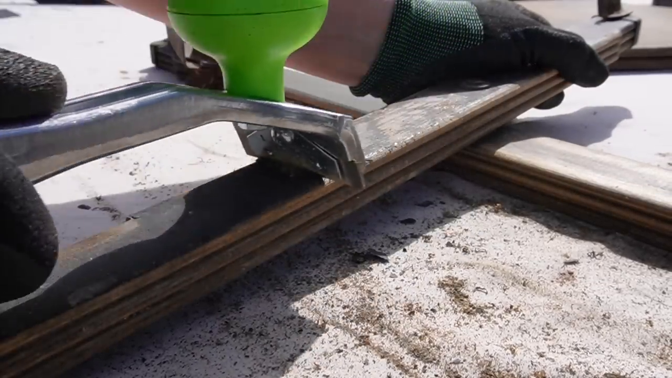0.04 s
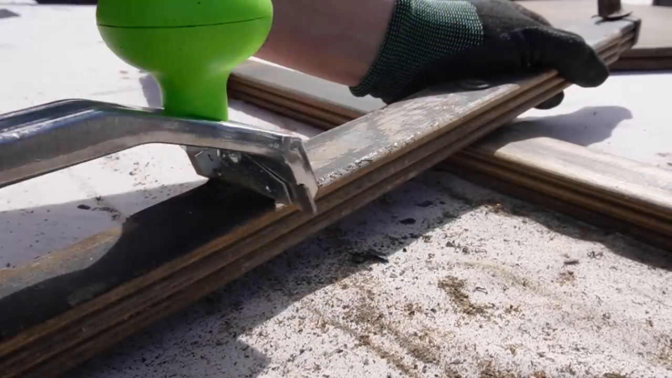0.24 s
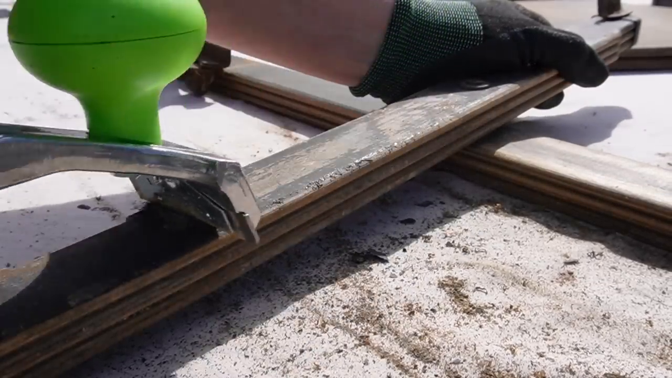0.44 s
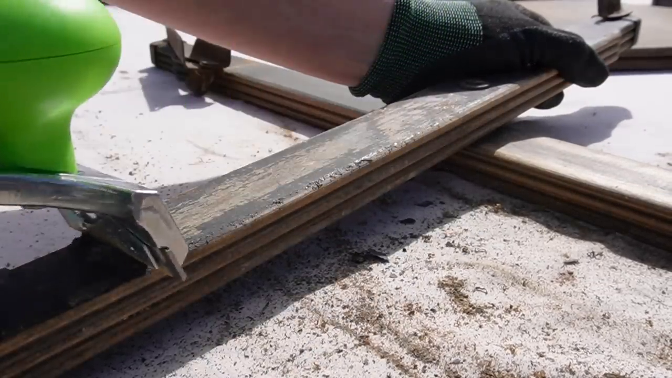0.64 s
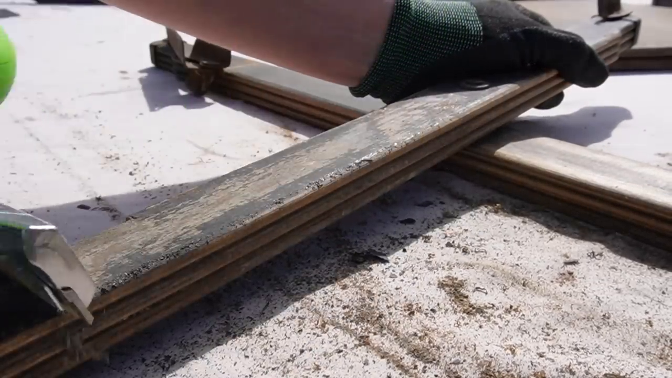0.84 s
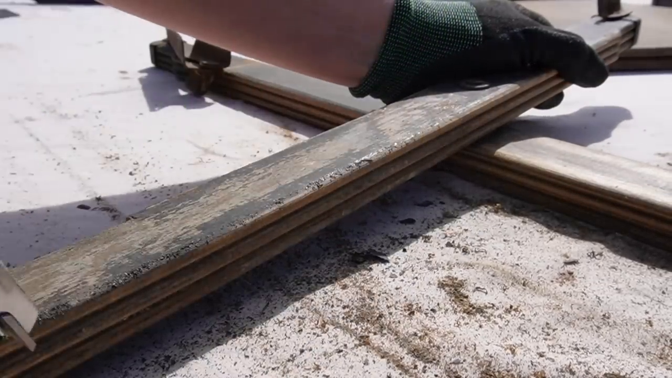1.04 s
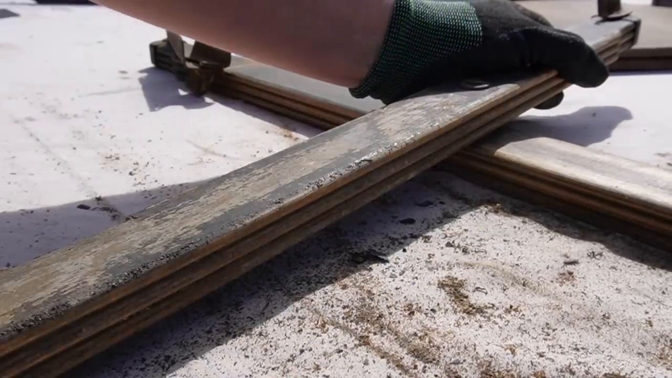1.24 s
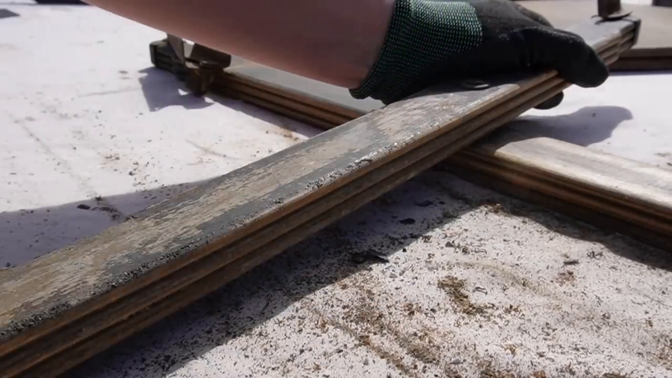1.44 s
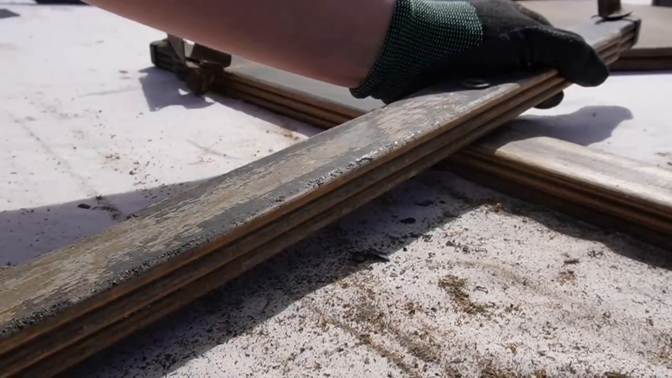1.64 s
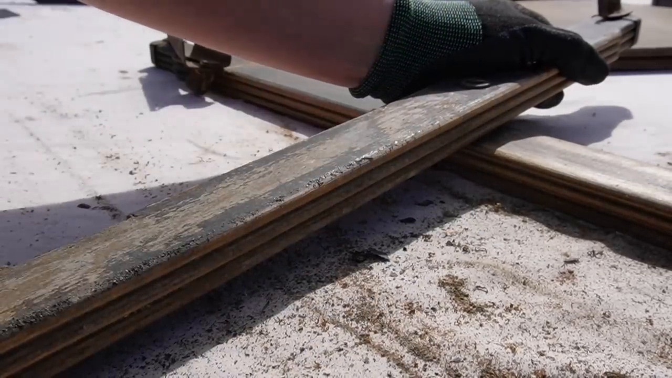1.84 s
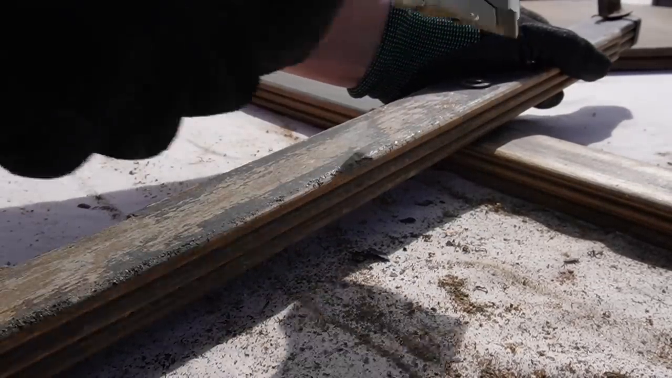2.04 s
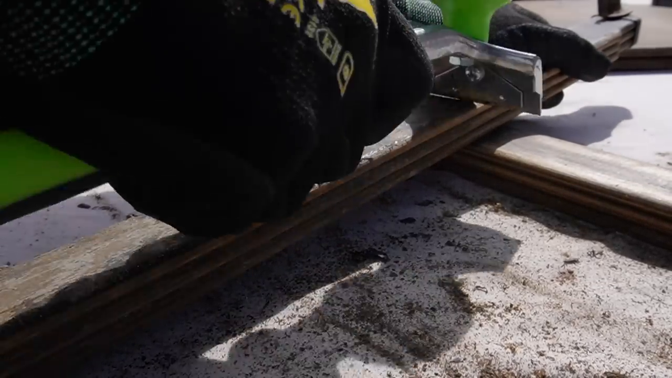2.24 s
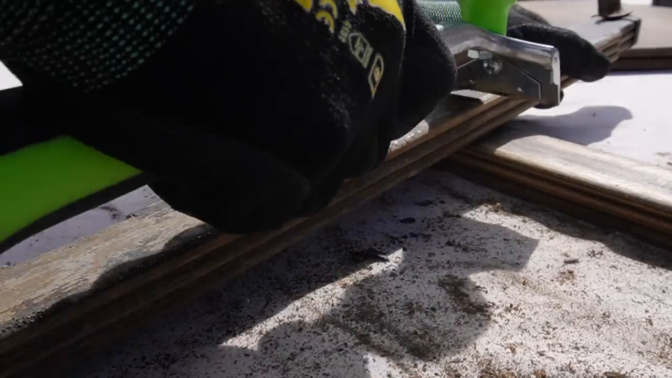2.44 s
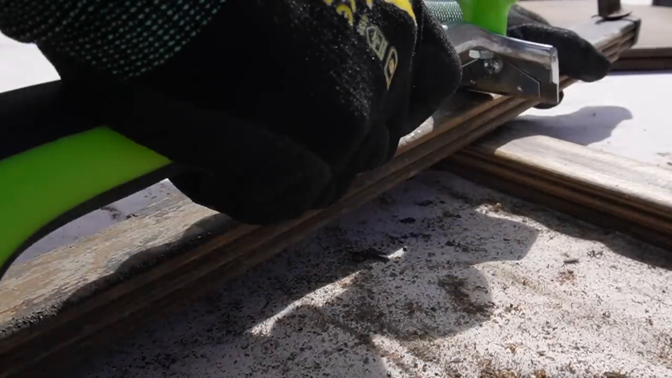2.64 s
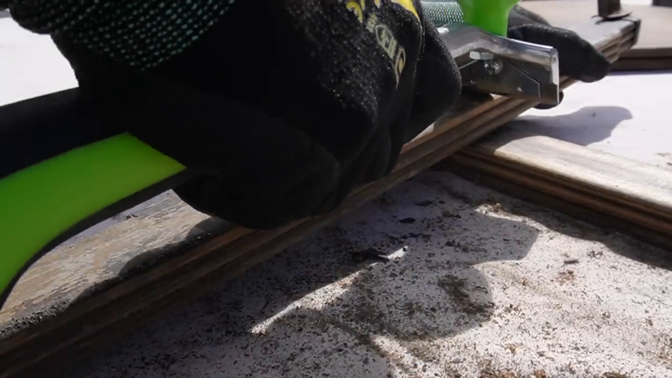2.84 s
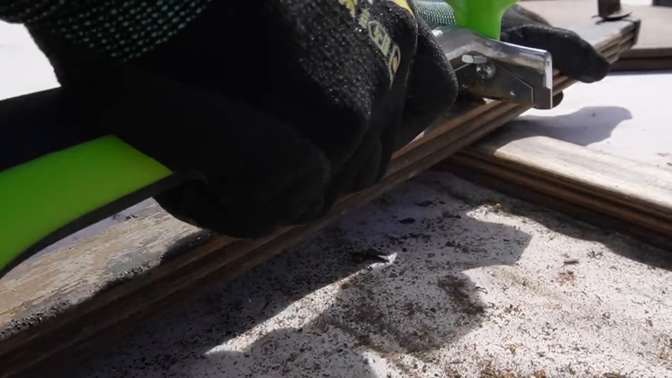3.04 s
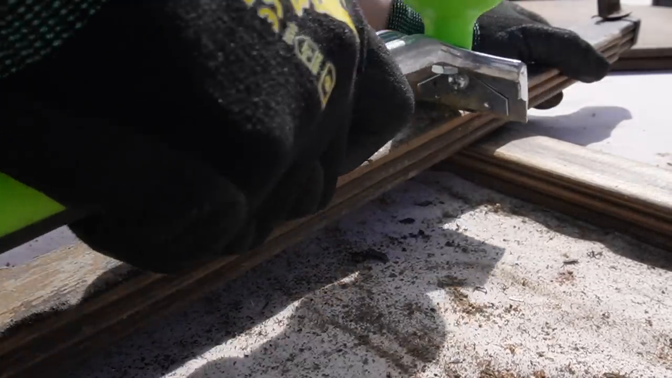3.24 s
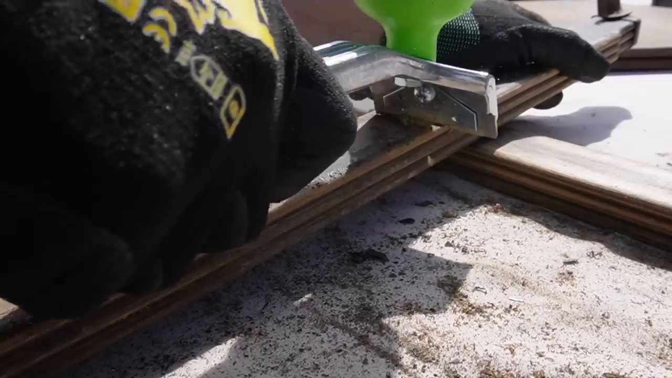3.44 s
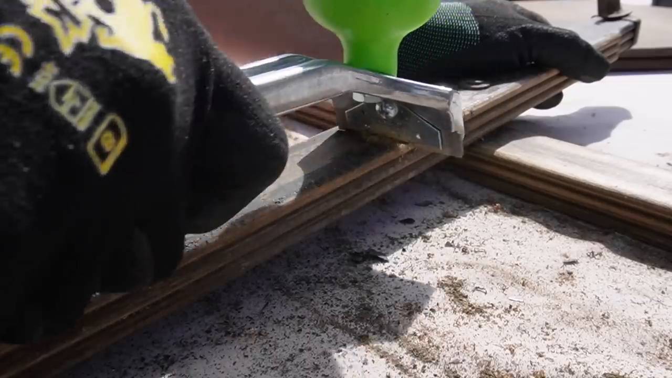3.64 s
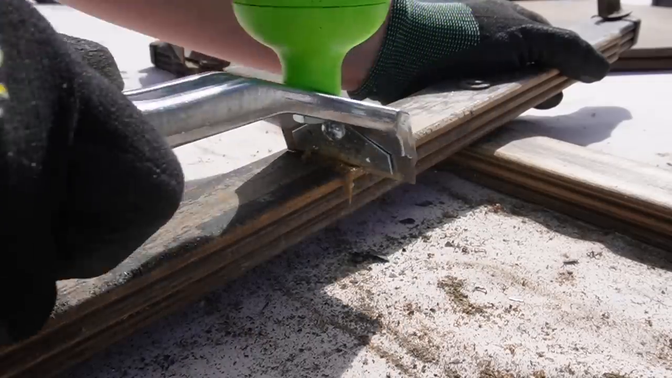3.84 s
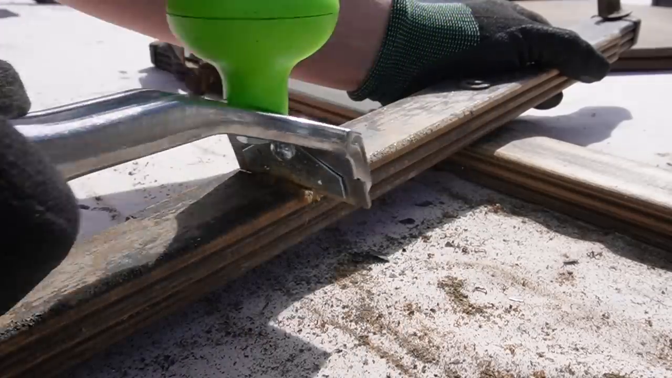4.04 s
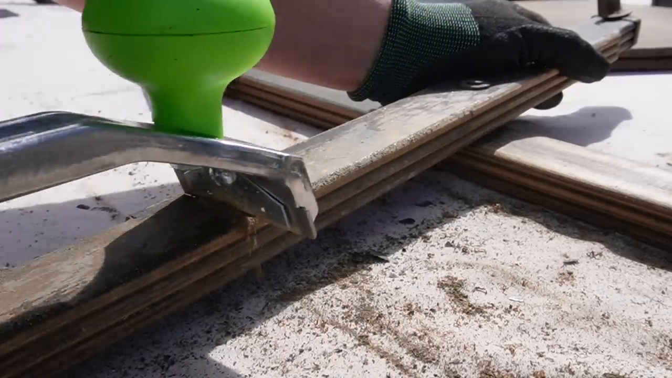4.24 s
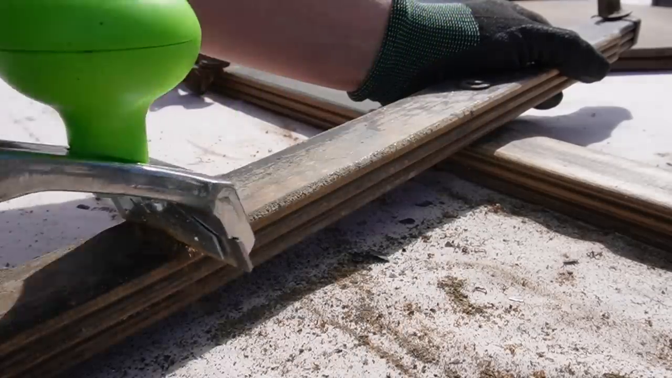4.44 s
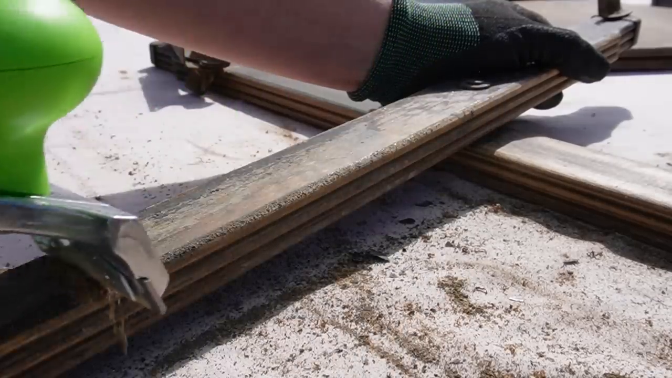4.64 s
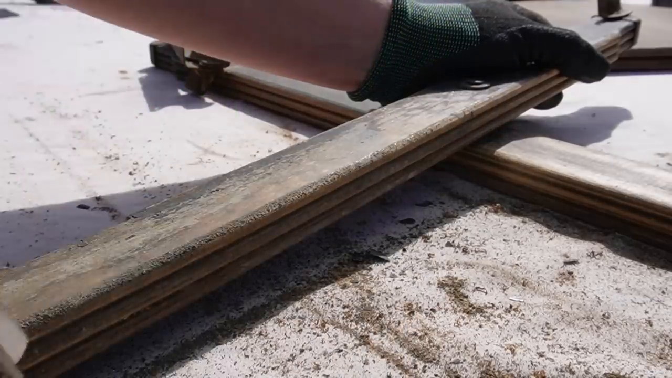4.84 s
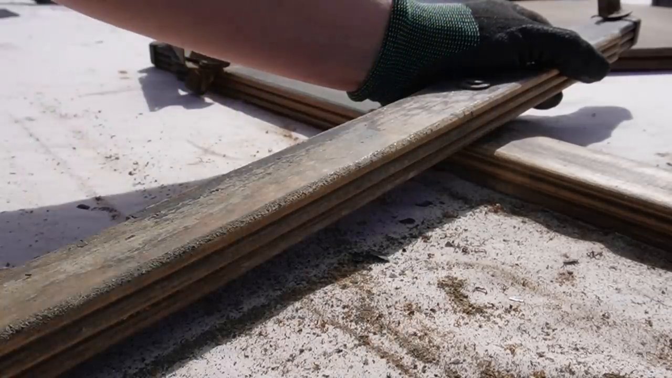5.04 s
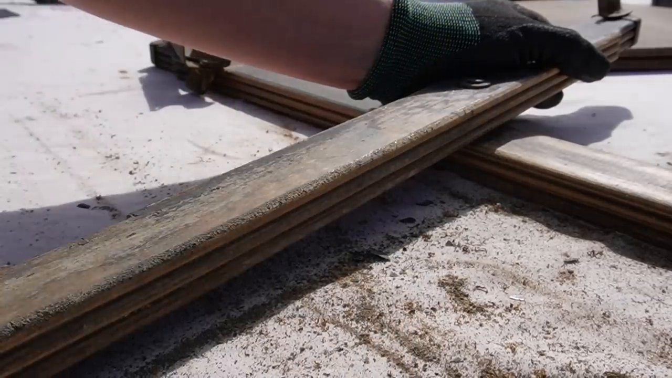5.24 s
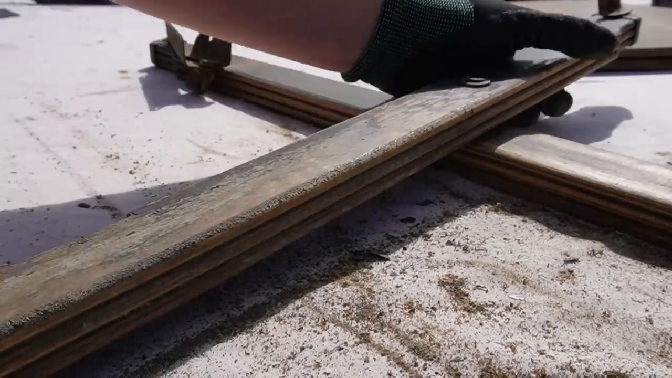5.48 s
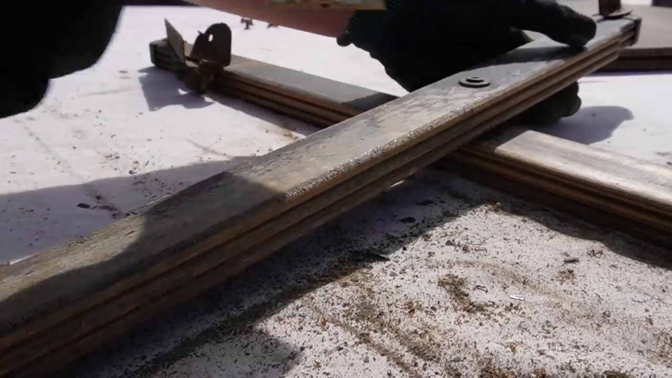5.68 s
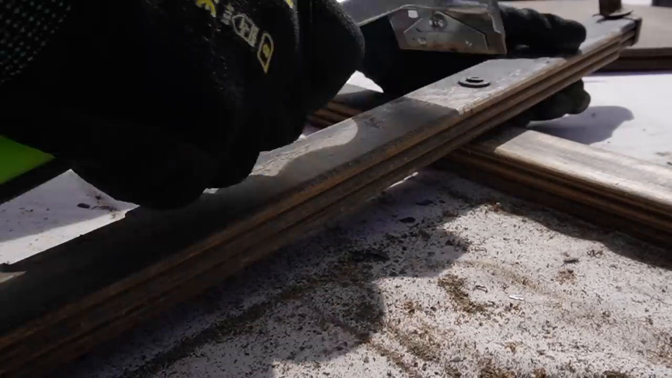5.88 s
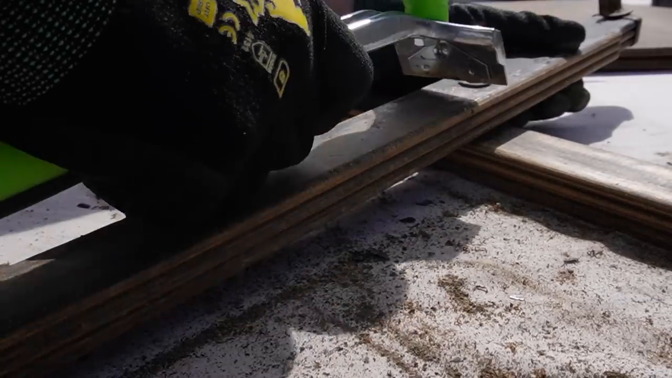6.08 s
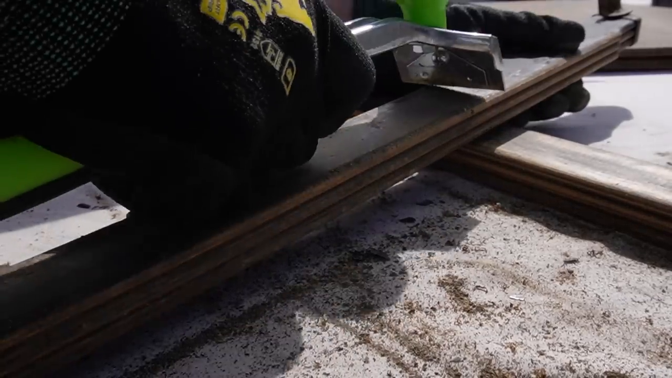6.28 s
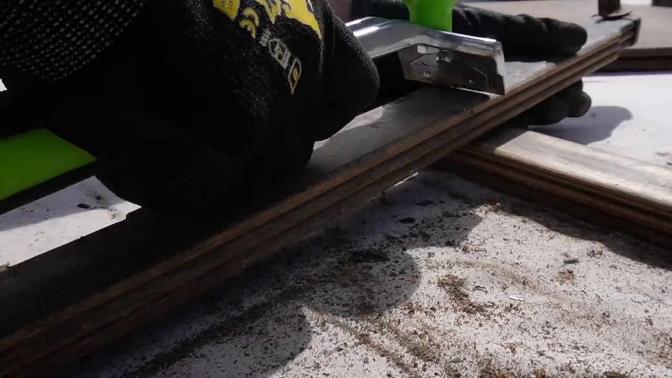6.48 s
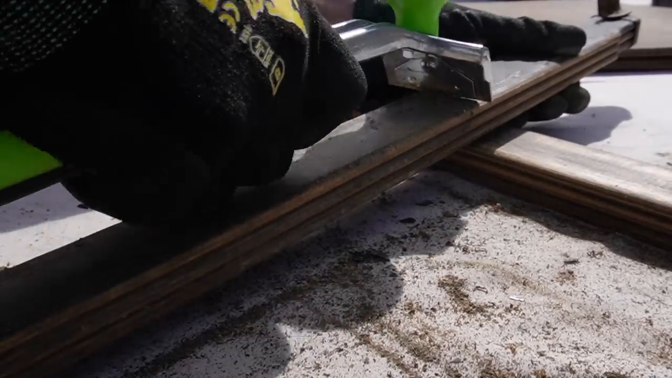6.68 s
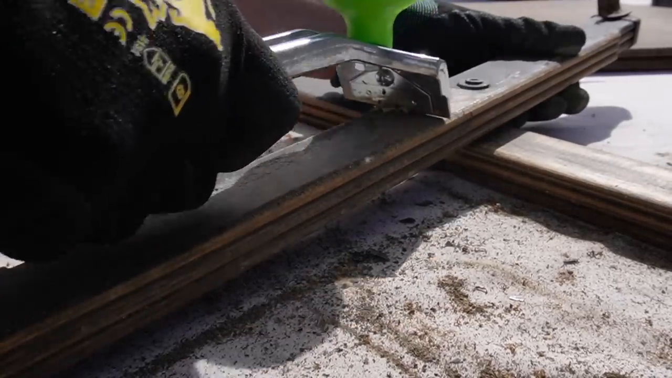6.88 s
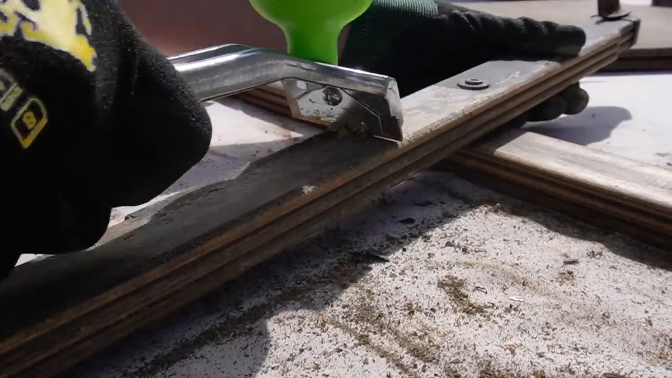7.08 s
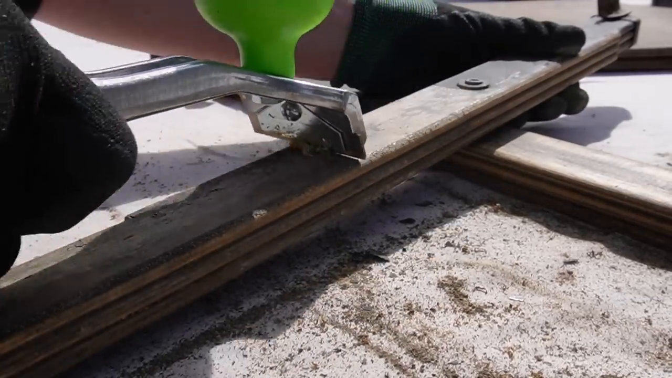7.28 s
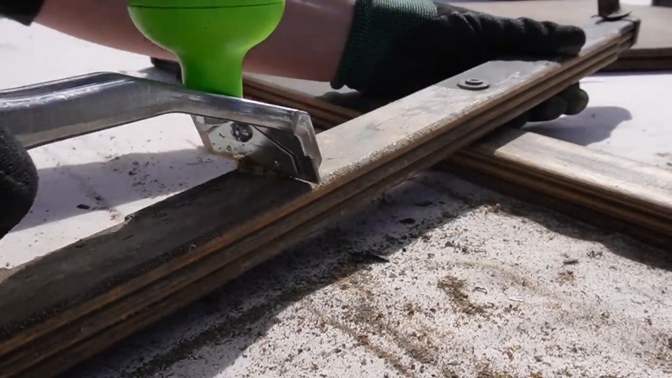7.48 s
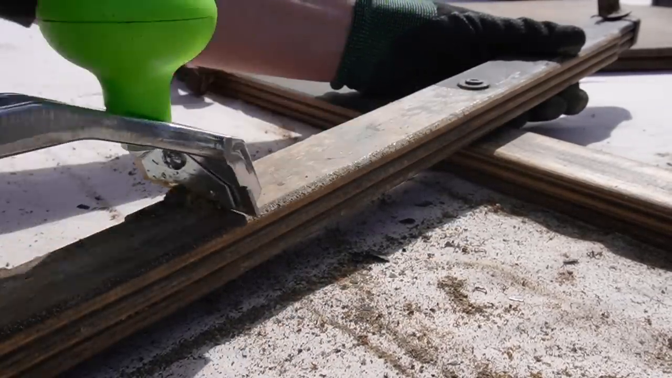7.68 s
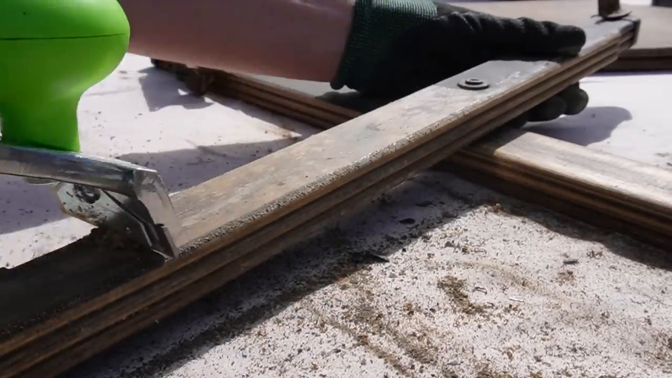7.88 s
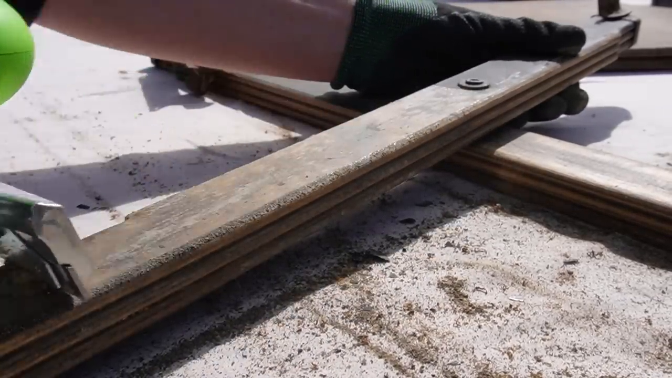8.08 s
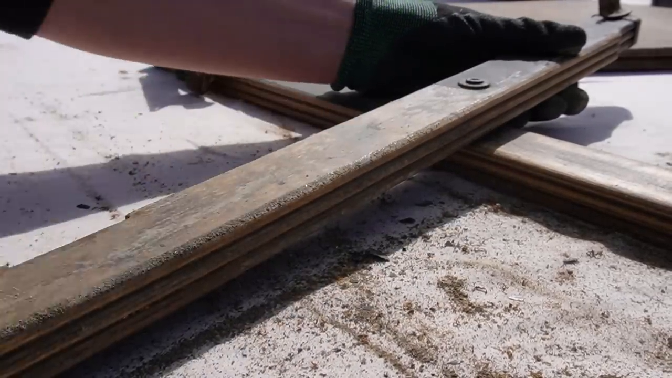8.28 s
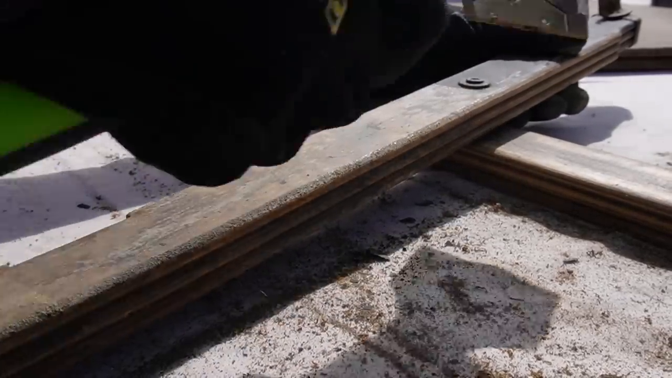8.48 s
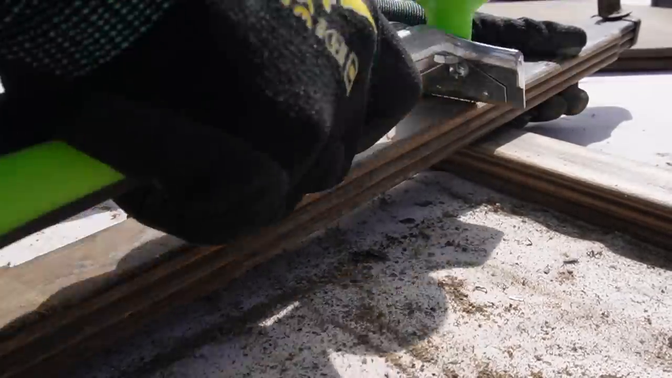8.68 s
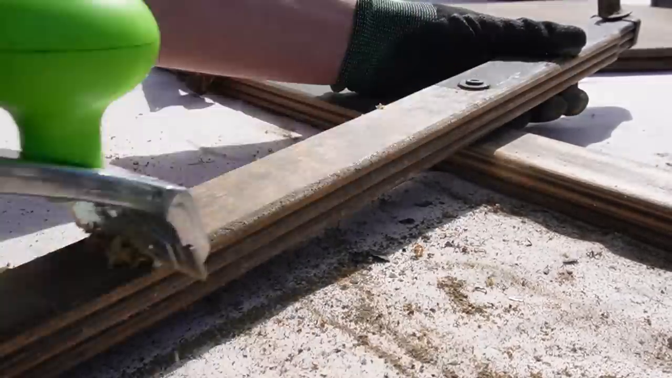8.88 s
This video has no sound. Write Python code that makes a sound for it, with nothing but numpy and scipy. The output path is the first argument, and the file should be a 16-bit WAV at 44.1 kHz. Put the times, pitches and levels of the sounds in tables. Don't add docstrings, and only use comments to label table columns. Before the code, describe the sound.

Close, gritty scraping of paint off plywood, tool knocks with faint steel rings, quiet yard birds, ending in a fast flurry of tiny hisses and clicks.

```python
import sys
import numpy as np
from scipy import signal
from scipy.fft import rfft, irfft, next_fast_len
from scipy.io import wavfile
from scipy.ndimage import uniform_filter1d

SR = 44100
rng = np.random.default_rng(int(sys.argv[2]) if len(sys.argv) > 2 else 0)


def transcribe(signal):
    frames = np.atleast_2d(signal).T
    limited = np.clip(frames, -1, 1)
    pcm = np.round(limited * 32767).astype(np.int16)
    wavfile.write(sys.argv[1], SR, pcm)


def gain_from_decibels(decibels):
    exponent = np.asarray(decibels, float) / 20
    return 10 ** exponent


N = 393372
SPEED_UP_S = 8.2

# time_s, pressure_db, board_load_db
PULLS = [
    [(0.0, -36.5, -3), (0.3, -34, -6.5), (0.7, -34.5, -5.5), (0.93, -34, -7.5), (1.1, -44.5, 0.5),
     (1.27, -40, -1), (1.44, -27.5, -14.5), (1.652, -36, -12), (1.685, -64, 5)],
    [(3.07, -47, -7), (3.13, -41, -9.5), (3.44, -37, -4), (3.9, -34.5, -4.5), (4.12, -31.5, -6),
     (4.72, -29, -3.5), (4.97, -35.5, 0.5), (5.335, -29, -13), (5.36, -75, 30)],
    [(6.682, -60.5, 11), (6.72, -41, -5), (7.05, -35.5, -10.5), (7.25, -35, -6), (7.45, -34.5, -4),
     (7.7, -31.5, -7), (7.9, -30.5, -9), (8.19, -35.5, -0.5), (8.21, -43, -6)],
]
# holder_db, blade_db, blade_fade_db, dulling_db, boom_place (0-1 along the strip)
GRIPS = [
    (-0.5, -10.5, 3, 19, 0.2),
    (-3.5, -9.5, 1, 11, 0.43),
    (0.5, -10, -1.5, 20, 0.55),
]
PART_EDGES_HZ = (1750, 3700, 7000)
LOAD_SHARE = (0.96, 0.2, 0.33, 0.14)
STALL_SHARE = (0.6, 0.9, 1.1, 1.4)
# pitch_hz, width_hz, level_db
RINGS_1 = [
    [(1320, 59, -9), (2104, 68, 4), (2910, 170, 6), (3290, 100, 1.5), (4740, 100, -7), (5820, 450, -7.5), (10600, 170, -11.5), (12400, 400, -10.5), (14500, 290, -9.5)],
    [(1448, 50, 1), (2520, 620, 3), (3340, 110, -2), (3760, 410, -5.5), (5580, 66, -0.5), (9530, 59, -9)],
]
RINGS_2 = [
    [(1380, 320, 0), (2610, 140, -4), (3210, 320, -3), (4050, 130, -4.5), (4800, 75, -7), (5970, 500, -9.5), (12380, 280, -1.5), (13600, 150, -12), (14550, 140, -8)],
    [(1376, 270, -3), (2073, 57, -1.5), (2400, 160, 0), (4800, 66, -8.5), (5930, 430, -8.5), (10230, 180, -13.5), (11970, 970, -17)],
    [(2550, 160, -6), (3330, 330, -2), (4800, 93, -10), (5620, 120, -6.5), (7400, 120, -32), ],
]
RINGS_3 = [
    [(1840, 360, -0.5), (2960, 400, -2), (4320, 360, -4.5), (5780, 170, 0), (9700, 240, -12.5), (11600, 210, -14.5), (13000, 160, -17), (15000, 40, -18)],
    [(1326, 170, 1.5), (2400, 110, -3), (2780, 180, -1), (3400, 84, -6), (6260, 170, -8.5), (12900, 230, -14), (15300, 200, -17)],
    [(1423, 35, 2.5), (2200, 500, -1), (2870, 160, -15), (3830, 82, -3.5), (4570, 70, -20), (5700, 110, -3), (13040, 140, -9)],
]
# pitch_hz, level_db
RASP_COLOUR = [(59, -76), (100, -9.5), (702, -16), (1410, -3), (2900, 5.5), (4430, -8.5), (5840, -3.5),
               (8190, -11.5), (12800, -16), (15800, -18.5)]
# pitch_hz, width_hz, level_db
PLYWOOD = [(363, 23, -14.5), (463.8, 10.3, -5), (616.9, 9.6, 1), (798, 104, -11.5), (1033, 20, -12)]
# time_s, dip_db, half_length_s
LIFTS = [(0.24, 3.5, 0.02), (0.505, 4.5, 0.016), (0.795, 6.5, 0.067), (1.03, 16, 0.029),
         (1.515, 8.5, 0.068), (3.499, 10.5, 0.027), (3.673, 3, 0.022), (4, 6.5, 0.046), (4.342, 4.5, 0.098),
         (4.596, 6.5, 0.083), (4.832, 4, 0.073), (6.933, 3, 0.03), (7.318, 5.5, 0.048), (7.6, 1.5, 0.1),
         (7.799, 5, 0.034), (8.018, 7.5, 0.088)]
# time_s, half_length_s, pitch_hz, glide_hz_per_s, level_db
BLOOMS = [(0.088, 0.091, 2870, 0, 9), (0.26, 0.11, 3390, 0, 6.5), (0.3, 0.11, 3640, 2000, 8.5),
          (0.56, 0.14, 2800, 800, 4), (0.11, 0.091, 4840, 0, 10), (0.5, .15, 770, 0, 7),
          (0.58, 0.091, 4600, 0, 9.5), (0.92, 0.059, 2030, 0, 8), (1.43, 0.049, 2600, 0, 5),
          (0.9, 0.13, 5900, 0, 7), (1.58, 0.14, 2580, 0, 7.5), (1.25, 0.073, 1570, 2, 5),
          (1.28, 0.19, 3600, 0, 7.5), (1.57, 0.16, 410, 0, 3.5), (1.3, 0.52, 835, 0, 6),
          (3.69, 0.2, 1560, 0, 6), (3.48, 0.18, 2600, 0, 8), (3.43, 0.053, 5680, 0, 15.5),
          (3.96, 0.11, 5600, 0, 9.5), (3.6, 0.046, 5300, 0, 6), (4.07, 0.12, 2950, 0, 5),
          (3.92, 0.063, 4950, 0, 12), (4.26, 0.33, 646, 0, 8.5), (3.8, 0.092, 2840, 0, 3),
          (4.6, 0.18, 4070, 0, 8), (4.82, 0.16, 1540, 600, 7.5), (5.27, 0.083, 2590, 300, 6),
          (5.22, 0.09, 3350, 600, 4), (6.92, .1, 3050, 800, 6), (7.2, .1, 3450, 0, 7),
          (7.6, 0.22, 2915, 300, 10.5), (7.72, 0.13, 3560, 2500, 11), (7.68, 0.13, 5750, -600, 6.5),
          (7.9, .12, 4020, 0, 4.5)]
# time_s, half_length_s, pitch_hz, glide_hz_per_s, level_db
NULLS = [(.1, 0.13, 4670, 0, -7), (0.34, 0.088, 4600, 0, -10), (0.52, 0.09, 5300, 500, -9),
         (1.43, .08, 3030, 0, -10), (0.057, 0.083, 5200, 0, -6), (1.19, 0.2, 2430, -1500, -10),
         (1.2, 0.14, 6200, 0, -7), (1.63, .06, 4600, 0, -9), (1.11, 0.066, 1450, 0, -9),
         (3.45, 0.36, 7750, -800, -17), (3.2, .3, 10800, -400, -5), (3.87, 0.26, 3430, 300, -11),
         (3.67, 0.14, 5030, -800, -12), (4.6, 0.22, 3540, 500, -16), (4.58, 0.12, 2700, 0, -7),
         (4.18, .12, 5480, -500, -10), (4.7, 0.044, 1450, 0, -9), (4.2, .2, 3900, 0, -7),
         (4.81, 0.42, 600, -2.5, -8.5), (4.92, .1, 5200, 0, -10), (5.1, 0.1, 1900, 0, -10),
         (6.8, 0.18, 410, 0, -7), (6.83, 0.23, 760, 0, -9), (7.15, 0.18, 2970, 0, -7),
         (7.4, 0.22, 4520, -600, -8), (7.55, 0.11, 4670, 0, -1), (7.73, 0.26, 5240, 0, -6),
         (7.2, .45, 10900, 500, -9), (6.9, .22, 13900, -800, -10), (7.3, .3, 8500, 0, -9),
         (8.03, .15, 12300, 0, -9), (7.95, .25, 15000, 0, -8), (7.15, .08, 7400, 0, -8),
         (1.49, 0.06, 1590, 0, -9), (4.17, .1, 4560, 0, -8), (5.3, 0.19, 3140, 300, -13)]
SLIPS_PER_S, TOUCH_SLIPS_PER_S = 11900, 1100
BLOOM_WIDTH_HZ, NULL_WIDTH_HZ, WIDER_PER_KHZ = 63, 97, 23
BOOM_HZ, BOOM_LOSS_DB = 910, 5.5

# time_s, level_db
RUMBLE = [(0.0, -82), (1.31, -68.5), (1.81, -79), (2.73, -80), (5.12, -68), (5.95, -79), (8.19, -61.5),
          (8.5, -87), (8.53, -95), (8.64, -95), (8.68, -79), (8.9, -79)]
# pitch_hz, level_db
RUMBLE_COLOUR = [(20, -19.5), (50, -15), (105, -3.5), (140, -18), (220, -37)]
# pitch_hz, level_db
AIR_COLOUR = [(71, -48), (120, -25), (170, 0), (208, -3), (602, -13.5), (724, -11), (2220, -13.5),
              (3210, -13), (15800, -49)]
# pitch_hz, level_db
QUICK_AIR_COLOUR = [(120, -84), (200, -49), (408, -9), (472, -3.5), (3050, -9.5), (4240, -14.5),
                    (15800, -22.5)]
AIR_DB, QUICK_AIR_DB = -69.5, -60.5

# start_s, level_db, treble_db
RUSTLES = [
    (1.65, -49, -59.5),
    (2.1, -65, -72),
    (5.33, -50, -65.5),
    (5.76, -61, -74),
    (6.4, -51.5, -67),
]
# pitch_hz, level_db
RUSTLE_COLOUR = [(120, -32), (200, -5.5), (1410, -14), (3160, -8), (4160, -2), (15800, -34)]
RUSTLE_RISE_S, RUSTLE_T60_S, REST_DB, REST_TREBLE_DB = 0.015, 1.19, -86, -86

# start_s, length_s, first_hz, last_hz, level_db
BLURRED_NOTES = [(1.68, 0.2, 2363, 2400, -62), (1.718, 0.11, 4200, 4290, -58.5),
                 (2.013, 0.04, 4900, 4600, -64), (2.082, 0.095, 4320, 4130, -66.5),
                 (2.105, 0.06, 2900, 2000, -67), (2.28, 0.053, 4330, 4150, -68),
                 (5.391, .07, 2370, 2350, -62.5), (5.661, .1, 4300, 4150, -73),
                 (5.942, 0.07, 4390, 4100, -65)]
# start_s, length_s, first_hz, last_hz, level_db
CLEAR_NOTES = [(2.044, 0.031, 4200, 3300, -62), (6.127, .055, 2960, 2550, -70),
               (6.26, 0.05, 4490, 4650, -60.5), (5.48, 0.064, 2400, 2360, -67),
               (5.78, 0.079, 4260, 4020, -67), (5.96, .06, 4600, 3950, -66),
               (6.043, 0.1, 4360, 3350, -61.5), (6.308, 0.072, 4250, 4060, -65),
               (6.49, 0.044, 4250, 3900, -63), (6.65, .04, 4100, 4150, -60)]
# start_s, length_s, first_hz, last_hz, level_db
THIN_NOTES = [
    (2.083, 0.039, 2960, 2955, -59),
    (6.05, 0.035, 4800, 4750, -64),
    (6.125, 0.03, 2960, 2950, -66),
]
BLURRED_BLUR_HZ, CLEAR_BLUR_HZ, THIN_BLUR_HZ = 350, 100, 30

# start_s, peak_db, thud_hz, treble_db, board_db
KNOCKS = [(2.342, -18, 2520, -10.5, 9), (2.351, -25.5, 3360, -13, -29), (2.633, -24, 1800, -12, 11.5),
          (2.64, -29, 1470, -9, -28), (2.745, -37.5, 1930, 2, 7), (2.977, -51, 3400, 2, -14),
          (3.014, -49, 3060, 11, -8), (3.038, -46, 3940, -10, 9), (6.247, -31, 3340, -6, 17),
          (6.2523, -18.5, 3600, -14, -26), (6.329, -46, 3300, 8, -5), (6.538, -23, 3740, -13, 1.5),
          (6.626, -34, 2620, 5, 2), (6.631, -38.5, 4300, 7, -10)]
# pitch_hz, level_db, t60_s
BOARD = [(235, -3.5, 0.052), (331, -14.5, 0.16), (440, -11, 0.068), (609, -12.5, 0.11), (758, -15, 0.14),
         (870, 2.5, 0.032), (1430, -18, 0.08), (1800, 1, 0.042)]
HOLDER_HZ = 4150
# start_s, lower_pair_db, upper_pair_db
CHIMES = [
    (2.352, -55, -59),
    (2.642, -65, -67),
    (6.254, -68, -69),
    (6.54, -76, -65),
]
# pitch_hz, level_db, t60_s
STEEL = [(5222, -8, .16), (7160, 0, .12), (9577, 0, .14), (11500, -4, .2)]
# start_s, length_s, first_db, last_db
TOUCHES = [(3.029, 0.045, -71, -60), (6.291, 0.05, -74, -65), (6.413, 0.072, -68, -71),
           (6.642, 0.035, -76, -70)]
# holder_db, blade_db, blade_fade_db, dulling_db, boom_place (0-1)
TOUCH_GRIP = (2, -1, -6, 10, 0)
TOUCH_LOAD_DB = 1
# start_s, peak_db
RATTLES = [(6.416, -50), (6.421, -44), (6.437, -48), (6.445, -52), (6.45, -52), (6.457, -51), (6.468, -56),
           (6.476, -55)]

# start_s, length_s, first_db, last_db
QUICK_STROKES = [(8.198, 0.082, -28.5, -31.5), (8.324, 0.028, -34, -30), (8.341, 0.032, -27, -26.5),
                 (8.41, 0.067, -29.5, -30), (8.499, 0.02, -36, -34), (8.657, 0.044, -37.5, -42.5),
                 (8.686, 0.038, -35, -35.5), (8.713, 0.041, -46, -59), (8.761, 0.036, -43.5, -34),
                 (8.79, .04, -30.5, -30), (8.863, 0.041, -43, -33.5), (8.89, 0.053, -28.5, -27.5)]
# pitch_hz, level_db
QUICK_COLOUR = [(60, -27), (180, -22.5), (250, -26.5), (3150, -18.5), (3740, -12), (4300, -10), (4860, -5),
                (6990, -4), (14700, 3), (15800, 1)]
# pitch_hz, width_hz, level_db
QUICK_RINGS = [(4946, 290, 4), (6250, 150, 5), (8100, 400, 3), (11100, 800, 4), (14610, 580, 3.5)]
QUICK_RISE_S, QUICK_FALL_S, QUICK_ENDS_DB, QUICK_LOW_DB = 0.0056, 0.014, -13, -14
# start_s, peak_db, board_db
QUICK_KNOCKS = [(8.312, -21.5, -13), (8.406, -19, -6), (8.499, -21, -11), (8.596, -24.5, -19),
                (8.76, -18, -12.5), (8.859, -14, -13), (8.464, -26, -20)]
# pitch_hz, level_db, t60_s
QUICK_BOARD = [(719, -13.5, 0.042), (1536, -17.5, 0.035), (2010, -12, 0.029)]
# start_s, level_db
GRABS = [(8.419, -29), (8.499, -33), (8.618, -43), (8.663, -35), (8.686, -27.5), (8.696, -29),
         (8.716, -25.5), (8.794, -30), (8.801, -25), (8.877, -28), (8.893, -17), (8.905, -19)]
# time_s, pitch_hz, level_db
HUM = [
    (8.42, 390, -67),
    (8.712, 444, -65.5),
    (8.9, 475, -77),
]

# pitch_hz, likeness (0-1)
LIKENESS = [(30, 0.98), (100, 1), (900, 0.97), (2200, 0.99), (3500, .95), (5500, 0.9), (10000, 0.82),
            (15000, 0.78)]
# pitch_hz, left_over_right_db
LEAN = [(61, 0.44), (3400, 0.5), (5500, 3), (9000, 0.54)]
# time_s, difference_db
ASIDE = [(0, -4), (0.5, -0.5), (1.66, 7.5), (3.07, -4.5), (5.36, 8), (6.69, -3), (8.19, 3.5), (8.21, -0.5),
         (8.52, -1), (8.64, -11)]
SIDE_DROP_DB, SIDE_KEPT_HZ = -18.5, 900
EDGE_HZ = 15760


def evened(x):
    return x / np.sqrt(np.mean(x ** 2) + 1e-20)


def read(points, hz):
    f, value = np.transpose(points)
    return np.interp(np.log(hz + 1), np.log(f + 1), value)


def add(mix, s, sound):
    part = mix[round(s * SR):][:len(sound)]
    part += sound[:len(part)]


def shaped(x, gain):
    size = next_fast_len(x.shape[-1] + 4096)
    spectrum = rfft(x, size) * gain(np.fft.rfftfreq(size, 1 / SR))
    return irfft(spectrum, size)[..., :x.shape[-1]]


def parts(x, edges_hz):
    lows = [0 * x]
    for edge in edges_hz:
        lows.append(shaped(x, lambda hz: 1 / (1 + (hz / edge) ** 12)))
    lows.append(x)
    return [evened(b - a) for a, b in zip(lows, lows[1:])]


def patchy(x, patchy_db, frames, bins, size=256, body=None):
    hz, t, z = signal.stft(x, SR, nperseg=size, noverlap=size * 3 // 4)
    patches = uniform_filter1d(rng.standard_normal(z.T.shape), frames, 0)
    patches = uniform_filter1d(patches, bins, 1)
    z = z * gain_from_decibels(patchy_db * evened(patches).T)
    if body:
        z = z * body(hz[:, None], t / t[-1])
    return signal.istft(z, nperseg=size, noverlap=size * 3 // 4)[1][:len(x)]


def slips(count, per_s, spread_db):
    chance, sign, strength = rng.random((count, 3)).T
    happens = chance < per_s / SR
    return happens * np.sign(sign - 0.5) * gain_from_decibels(-spread_db * np.log(strength + 0.032))


def played(rows):
    s, *columns = np.transpose(rows)
    t = np.arange(s[0], s[-1], 1 / SR)
    since_start = t - s[0] + (s[0] == 0)
    until_end = s[-1] - t + (s[-1] > N / SR - 0.01)
    fade = np.clip(np.minimum(since_start, until_end) / 0.004, 0, 1)
    return s[0], fade, [np.interp(t, s, c) for c in columns]


def rung(modes, t):
    return sum(gain_from_decibels(db - 60 * t / t60) * np.sin(2 * np.pi * hz * t) for hz, db, t60 in modes)


def two_part(rows, colour, edge_hz, per_s, spread_db, patchy_db):
    s, fade, columns = played(rows)
    hiss = shaped(slips(len(fade) + 512, per_s, spread_db), lambda hz: gain_from_decibels(read(colour, hz)))
    low, high = parts(patchy(hiss, patchy_db, frames=6, bins=5)[:len(fade)], [edge_hz])
    return s, fade, low, high, columns


def passing_db(hz, t, table, width_hz):
    total_db = 0
    for at, half, f, glide, db in table:
        if t.min() - 0.1 < at < t.max():
            width = width_hz + WIDER_PER_KHZ * f / 1000
            off_pitch = (hz - f - glide * (t - at)) / width
            total_db = total_db + db * np.exp(-((t - at) / half) ** 2 - off_pitch ** 2)
    return total_db


def ringing(hz, modes):
    power = 0
    for f, width, db in modes:
        off_pitch = 2 * (hz - f) / (width + f * f / 2e6)
        power = power + gain_from_decibels(db) ** 2 / (1 + off_pitch ** 2) ** 1.06
    return power


def stroke(rows, rings, holder_db, blade_db, fade_db, dulling_db, boom_at, per_s):
    s, fade, (pressure_db, load_db) = played(rows)
    count = len(fade) + 2048

    def body(hz, place):
        power = gain_from_decibels(read(RASP_COLOUR, hz) - 9.5) ** 2 + ringing(hz, PLYWOOD)
        for k, modes in enumerate(rings):
            nearness = np.clip(1 - abs(place * (len(rings) - 1) - k), 0, 1)
            power = power + nearness ** 0.79 * ringing(hz, modes)
        now = s + place * count / SR
        spot_db = passing_db(hz, now, BLOOMS, BLOOM_WIDTH_HZ) + passing_db(hz, now, NULLS, NULL_WIDTH_HZ)
        shade_db = dulling_db * place * np.clip(np.log2(hz / 9000 + 1e-9), 0, 1)
        held_down_db = BOOM_LOSS_DB * (place - boom_at) ** 2 / (1 + (hz / BOOM_HZ) ** 4)
        low_cut = hz ** 2 / (hz ** 2 + 120 ** 2)
        return np.sqrt(power) * low_cut * gain_from_decibels(spot_db - shade_db - held_down_db)

    drive = patchy(slips(count, per_s, 3.2), 0.89, frames=40, bins=5)
    rasp = patchy(drive, 2.38, frames=20, bins=5, size=2048, body=body)[:len(fade)]
    judder = evened(uniform_filter1d(rng.standard_normal(len(fade)), size=500))
    t = s + np.arange(len(fade)) / SR
    stall_db = sum(db * np.exp(-((t - at) / half) ** 2) for at, db, half in LIFTS)
    held_db = (0, 0, holder_db, blade_db - fade_db * np.linspace(0, 1, len(t)))
    scrape = 0
    for part, held, load, stall in zip(parts(rasp, PART_EDGES_HZ), held_db, LOAD_SHARE, STALL_SHARE):
        scrape = scrape + gain_from_decibels(pressure_db + held + load * load_db - stall * stall_db) * part
    return s, fade * gain_from_decibels(0.97 * judder) * scrape


def rumble():
    s, fade, (db,) = played(RUMBLE)
    noise = rng.standard_normal(len(fade))
    return s, fade * gain_from_decibels(db) * evened(shaped(noise, lambda hz: gain_from_decibels(read(RUMBLE_COLOUR, hz))))


def air():
    quick = np.clip((np.arange(N) / SR - SPEED_UP_S) / 0.01, 0, 1)
    noise = rng.standard_normal(N) + 0.81 * rng.standard_normal((2, N))
    slow = gain_from_decibels(AIR_DB) * evened(shaped(noise, lambda hz: gain_from_decibels(read(AIR_COLOUR, hz))))
    fast = gain_from_decibels(QUICK_AIR_DB) * evened(shaped(noise, lambda hz: gain_from_decibels(read(QUICK_AIR_COLOUR, hz))))
    return (1 - quick) * slow + quick * fast


def rustle():
    rows = [(0, 0), (SPEED_UP_S, SPEED_UP_S)]
    s, fade, low, high, (t,) = two_part(rows, RUSTLE_COLOUR, 3800, 6000, 1.8, 0.97)
    low_gain, high_gain = gain_from_decibels(REST_DB), gain_from_decibels(REST_TREBLE_DB)
    for at, db, treble_db in RUSTLES:
        swell = np.clip((t - at) / RUSTLE_RISE_S, 0, 1) * gain_from_decibels(-60 * np.maximum(t - at, 0) / RUSTLE_T60_S)
        low_gain = low_gain + gain_from_decibels(db) * swell
        high_gain = high_gain + gain_from_decibels(treble_db) * swell
    return s, fade * (gain_from_decibels(-9.5) * low_gain * low + gain_from_decibels(-1.5) * high_gain * high)


def bird(s, length, first_hz, last_hz, db, blur_hz):
    t = np.arange(0, length + 0.23, 1 / SR)
    trill = np.sin(2 * np.pi * 28 * t)
    hz = np.interp(t, [0, length], [first_hz, last_hz]) + 0.556 * blur_hz * trill
    r = np.exp(-np.pi * max(2.1 * blur_hz, 10) / SR)
    noise = rng.standard_normal((len(t) + 2000, 2)) @ [1, 1j]
    blur = signal.lfilter([1], [1, -2 * r, r * r], noise)[-len(t):]
    swell = np.clip(t / 0.0081, 0, 1) * gain_from_decibels(-900 * np.maximum(t - length, 0) + 0.98 * trill)
    note = swell * evened((blur * np.exp(2j * np.pi * np.cumsum(hz) / SR)).real)
    echoes = rng.standard_normal(len(t)) * gain_from_decibels(-60 * t / 0.33)
    echoed = signal.fftconvolve(note, echoes / np.linalg.norm(echoes))[:len(t)]
    return s, gain_from_decibels(db) * (0.74 * note + 0.84 * echoed)


def knock(s, db, hz, treble_db, board_db):
    t = np.arange(SR // 5) / SR
    noise = rng.standard_normal(len(t))

    def crack_colour(f):
        band = (f / (f + 700)) ** 2 / (1 + (f / 4800) ** 10)
        return band * (0.31 + 1 / (1 + ((f - hz) / 800) ** 2))

    crack = evened(shaped(noise, crack_colour))
    burst = (t / 0.0023) ** 1.12 * np.exp(1.47 * (1 - t / 0.0015))
    tones = 0.58 * np.sin(2 * np.pi * hz * t) + 0.3 * np.sin(2 * np.pi * HOLDER_HZ * t)
    blow = (tones + 0.34 * crack + gain_from_decibels(treble_db - 15.5) * noise) * burst
    dying = gain_from_decibels(-22.0 - 60 * t / 0.039) + gain_from_decibels(-36.5 - 60 * t / 0.21)
    tail = crack * dying * np.clip(t / 0.00052, 0, 1)
    boom = gain_from_decibels(board_db - 23.0) * rung(BOARD, t) * np.clip(t / 0.0043, 0, 1)
    return s, gain_from_decibels(db + 0.5) * (blow + tail + boom)


def chime(s, low_db, high_db):
    t = np.arange(SR // 4) / SR
    rings = gain_from_decibels(low_db) * rung(STEEL[:2], t) + gain_from_decibels(high_db) * rung(STEEL[2:], t)
    return s, rings * np.clip(t / 0.002, 0, 1)


def touch(s, length, first_db, last_db):
    rows = [(s, first_db, TOUCH_LOAD_DB), (s + length, last_db, TOUCH_LOAD_DB)]
    return stroke(rows, RINGS_3, *TOUCH_GRIP, TOUCH_SLIPS_PER_S)


def rattle(s, db):
    return knock(s, db, 3100, 11, 8)


def quick_rings(x):
    def gain(hz):
        return gain_from_decibels(sum(db * np.exp(-((hz - f) / width) ** 2) for f, width, db in QUICK_RINGS))

    return evened(shaped(x, gain))


def quick_stroke(s, length, first_db, last_db):
    rows = [(s, first_db + QUICK_ENDS_DB),
            (s + min(QUICK_RISE_S, length / 4), first_db),
            (s + length - min(QUICK_FALL_S, length / 2), last_db),
            (s + length, last_db + QUICK_ENDS_DB)]
    s, fade, low, high, (db,) = two_part(rows, QUICK_COLOUR, 3800, 20000, 4.0, 2.6)
    return s, fade * gain_from_decibels(db) * (quick_rings(high) + gain_from_decibels(QUICK_LOW_DB) * low)


def quick_knock(s, db, board_db):
    t = np.arange(SR // 10) / SR
    noise = shaped(rng.standard_normal(len(t)), lambda hz: hz ** 4 / (hz ** 4 + 900 ** 4))
    dying = gain_from_decibels(-60 * t / 0.0032) + 0.25 * gain_from_decibels(-60 * t / 0.018)
    tick = noise * dying * np.clip(t / 0.00034, 0, 1)
    return s, gain_from_decibels(db - 2.5) * (tick + gain_from_decibels(board_db + 3.5) * rung(QUICK_BOARD, t))


def grab(s, db):
    t = np.arange(SR // 20) / SR
    hiss = quick_rings(shaped(rng.standard_normal(len(t)), lambda hz: gain_from_decibels(read(QUICK_COLOUR, hz))))
    return s, gain_from_decibels(db - 60 * t / 0.034) * np.clip(t / 0.0011, 0, 1) * hiss


def engine_hum():
    s, fade, (hz, db) = played(HUM)
    flutter = evened(uniform_filter1d(rng.standard_normal(len(hz)), size=900))
    turn = 2 * np.pi * np.cumsum(hz) / SR + 0.44 * flutter[::-1]
    tones = np.sin(turn) + gain_from_decibels(-9) * np.sin(1.37 * turn) + gain_from_decibels(-6) * np.sin(2 * turn)
    return s, fade * gain_from_decibels(db + 6 + 2.0 * flutter) * tones


def ports(x):
    taps = rng.standard_normal(2000) * gain_from_decibels(-60 * np.arange(2000) / SR / 0.04)
    other = signal.oaconvolve(x, taps / np.linalg.norm(taps))[:N]
    unlike = shaped(other, lambda hz: 0.5 * np.sqrt(1 - np.clip(read(LIKENESS, hz), 0, 1) ** 2))

    def lean_gain(hz):
        left_over_right = gain_from_decibels(read(LEAN, hz))
        return (left_over_right - 1) / (left_over_right + 1)

    lean = shaped(x, lean_gain) * (np.arange(N) < SPEED_UP_S * SR)
    side = patchy(np.pad(unlike + lean, (0, 2048)), 2.6, frames=14, bins=12, size=1024)[:N]
    side = side * gain_from_decibels(np.interp(np.arange(N) / SR, *np.transpose(ASIDE)))
    return np.array([x + side, x - side])


def scene():
    mix = np.zeros(N)
    for rows, rings, grip in zip(PULLS, (RINGS_1, RINGS_2, RINGS_3), GRIPS):
        add(mix, *stroke(rows, rings, *grip, SLIPS_PER_S))
    add(mix, *rumble())
    add(mix, *rustle())
    for blur_hz, table in ((BLURRED_BLUR_HZ, BLURRED_NOTES), (CLEAR_BLUR_HZ, CLEAR_NOTES),
                           (THIN_BLUR_HZ, THIN_NOTES)):
        for row in table:
            add(mix, *bird(*row, blur_hz))
    for source, table in ((knock, KNOCKS), (chime, CHIMES), (touch, TOUCHES), (rattle, RATTLES),
                          (quick_stroke, QUICK_STROKES), (quick_knock, QUICK_KNOCKS), (grab, GRABS)):
        for row in table:
            add(mix, *source(*row))
    hum = np.zeros(N)
    add(hum, *engine_hum())
    return ports(mix) + air() + hum


def low_pass(x):
    return signal.sosfilt(signal.butter(12, 16770, fs=SR, output="sos"), x)


def record(dry):
    middle_and_side = np.array([dry[0] + dry[1], dry[0] - dry[1]]) / 2
    hz, t, z = signal.stft(middle_and_side, SR, nperseg=1024)
    mid, side = (abs(z[:, :512]) ** 2).reshape(2, 64, 8, -1).mean(2)
    weak = (mid < gain_from_decibels(-33) ** 2 * mid[2:20].mean(0)) & (np.arange(64)[:, None] > 20)
    weak &= t < SPEED_UP_S
    faint = uniform_filter1d(side, size=5) < gain_from_decibels(SIDE_DROP_DB) ** 2 * uniform_filter1d(mid, size=5)
    faint &= hz[:512:8, None] > SIDE_KEPT_HZ
    z[:, :512] *= 1.0 - np.repeat([weak, weak | faint], 8, axis=1)
    mid, side = signal.istft(z, nperseg=1024)[1][:, :N]
    mix = shaped(np.array([mid + side, mid - side]), lambda hz: 1 / (1 + (hz / EDGE_HZ) ** 150))
    return low_pass(mix)


dry = scene()
out = record(dry)
transcribe(out)
```